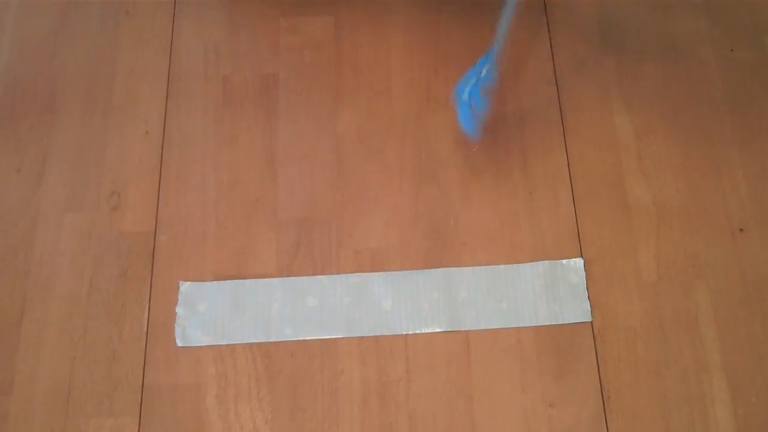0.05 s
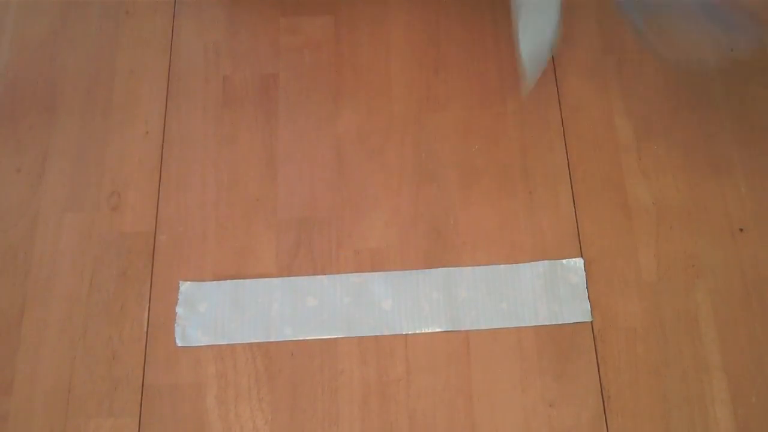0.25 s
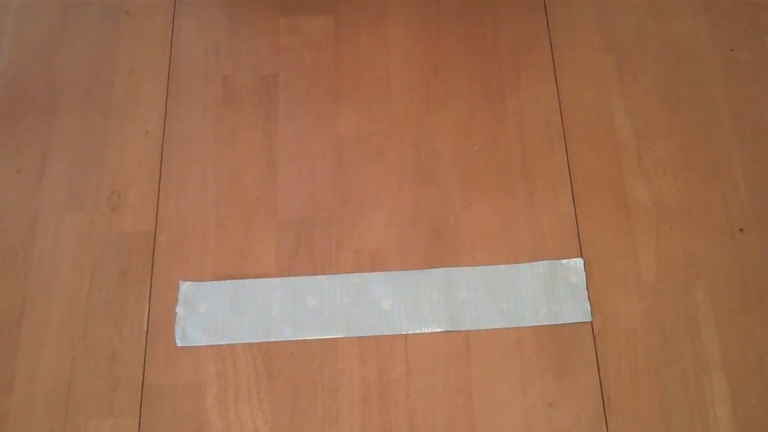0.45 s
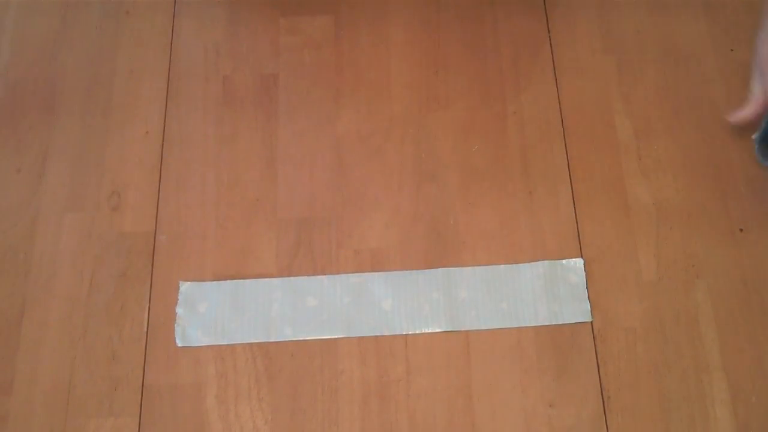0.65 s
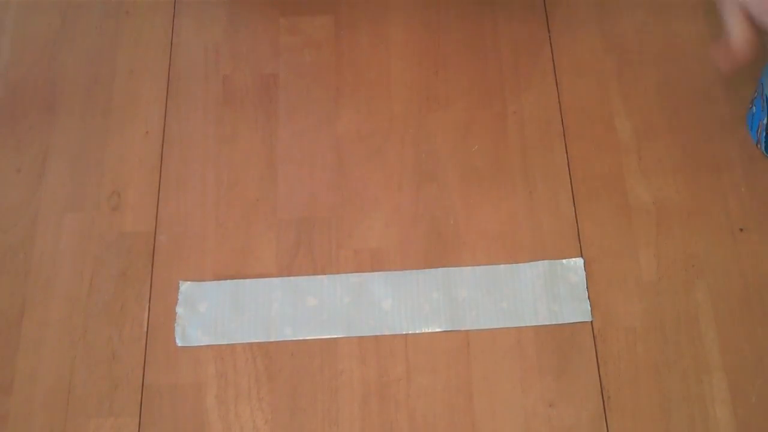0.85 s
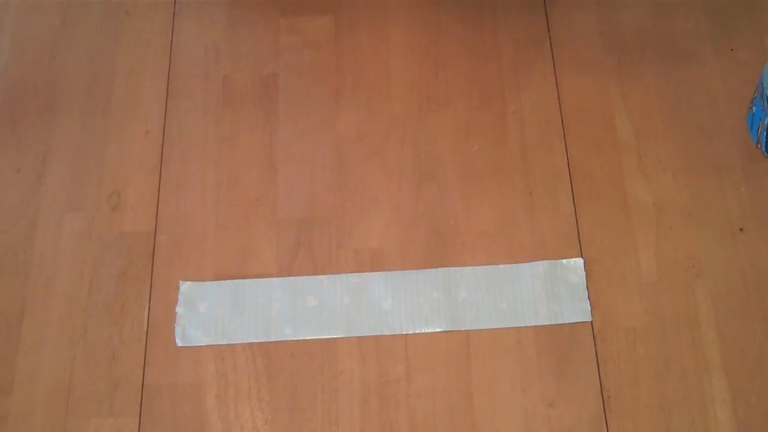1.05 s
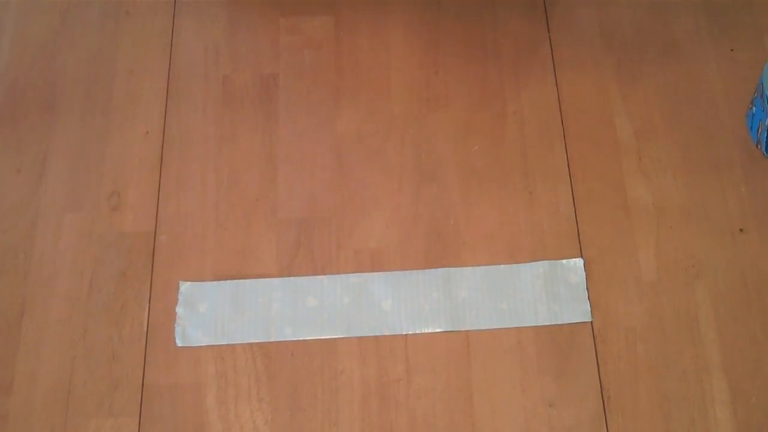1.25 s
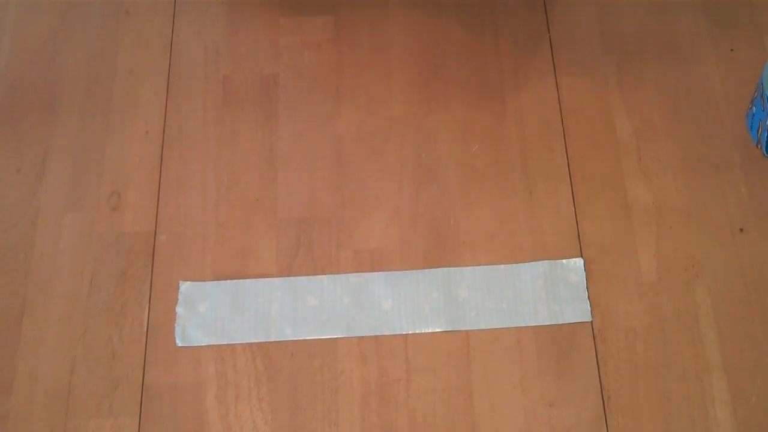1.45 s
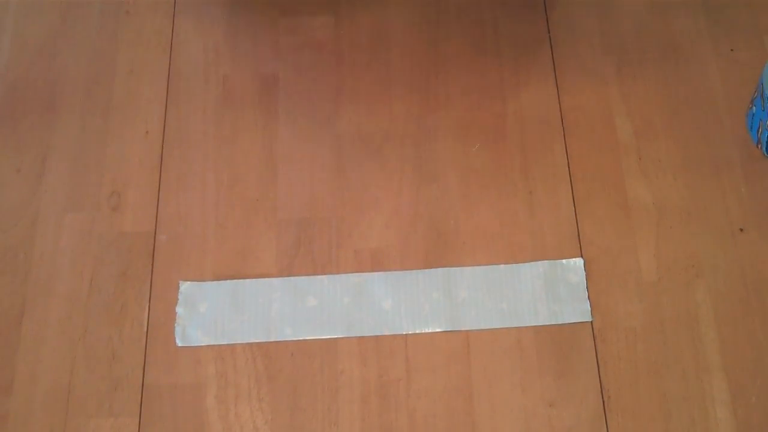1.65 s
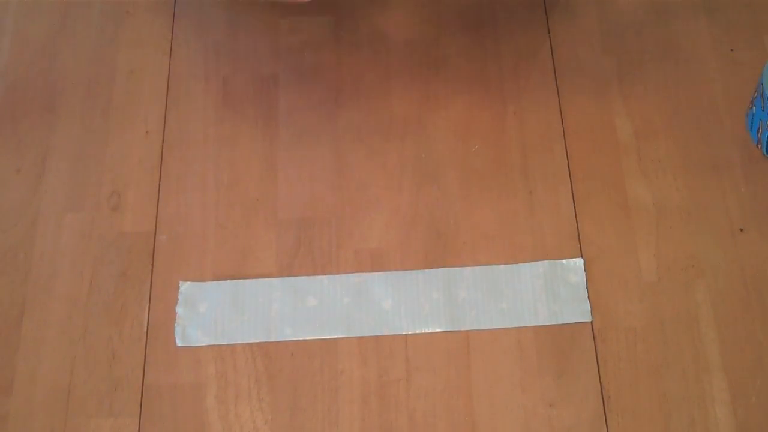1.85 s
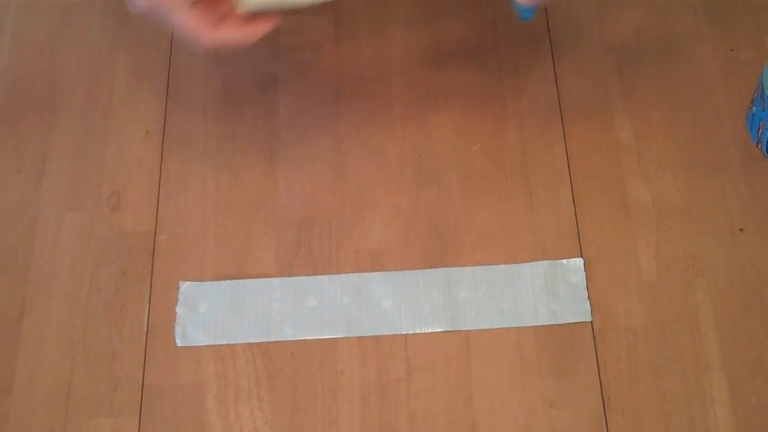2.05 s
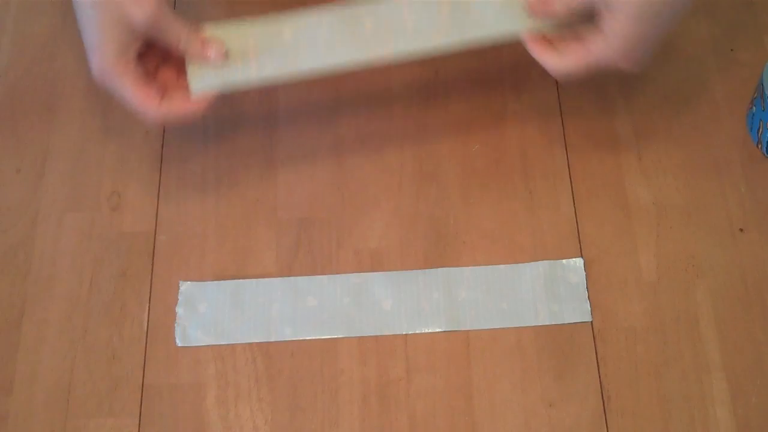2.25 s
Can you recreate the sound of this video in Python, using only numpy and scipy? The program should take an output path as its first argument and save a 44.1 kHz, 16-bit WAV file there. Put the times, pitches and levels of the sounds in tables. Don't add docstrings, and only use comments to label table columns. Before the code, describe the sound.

Cloth tape is torn by hand, single snaps speeding into a short harsh rip; the roll then clunks twice on a wooden surface, with faint jingles and rustling afterward, close microphone in a quiet humming room.

```python
import sys
import numpy as np
from scipy import signal
from scipy.fft import rfft, irfft
from scipy.io import wavfile
from scipy.ndimage import uniform_filter1d

SR = 44100
rng = np.random.default_rng(int(sys.argv[2]) if len(sys.argv) > 2 else 0)


def invert_db(x):
    u = np.asarray(x, float) / 20
    return 10 ** u


def generate_wav(sig):
    pcm = np.round(np.clip(np.atleast_2d(sig).T, -1, 1) * 32767).astype(np.int16)
    wavfile.write(sys.argv[1], SR, pcm)


N = 101429


def place(times, sizes):
    return np.bincount(np.clip((np.asarray(times) * SR).astype(int), 0, N - 1), sizes, N)


def band(x, hz, width):
    edge = np.sqrt(1 + width ** 2 / 4) + width / 2
    limits = [hz / edge, min(hz * edge, .45 * SR)]
    return signal.sosfilt(signal.butter(1, limits, "band", fs=SR, output="sos"), x)


def band_twice(x, hz, width):
    return band(band(x, hz, width), hz, width)


def colour(x, table):
    hz, db = np.array(table).T
    bins_hz = np.arange(len(x) // 2 + 1) * SR / len(x) + 1
    y = irfft(rfft(x) * invert_db(np.interp(np.log(bins_hz), np.log(hz), db)), len(x))
    return y / np.std(y)


def ring(x, hz, t60):
    pole = np.exp(2j * np.pi * hz / SR - np.log(1000) / (t60 * SR))
    return signal.lfilter([1], [1, -pole], x).imag


def walk(rate):
    w = rng.standard_normal(N // 200 + 2)
    k = max(int(SR / 200 / rate), 1)
    smooth = uniform_filter1d(uniform_filter1d(w, k), k)
    w = np.interp(np.arange(N) / 200, np.arange(len(w)), smooth)
    return w / np.std(w)


# frequency in Hz, level in dB.
AIR_COLOUR = [(25, 2), (130, -11.5), (230, -8.5), (400, -6), (900, -9.5), (3000, -18), (6000, -24.5),
              (13000, -30.5)]
# frequency in Hz, level in dB.
HUMS = [(361, -87), (414, -78.5), (458, -83.5), (888, -78.5)]
AIR_DB = -66.5


def room(t):
    hum = 0
    for hz, db in HUMS:
        hum = hum + invert_db(db + 2.6 * walk(18.0)) * np.sqrt(2) * np.sin(2 * np.pi * hz * t)
    return colour(rng.standard_normal(N), AIR_COLOUR) * invert_db(AIR_DB + 0.39 * walk(18)) + hum


# frequency in Hz, time to fall by 60 dB in seconds, level in dB.
ROOM_DECAY = [(314, 0.41, -7.5), (1040, 0.39, 2), (3000, 0.19, -4), (9450, 0.15, -0.5)]


def echo(x):
    t = np.arange(SR // 2) / SR
    tail = 0
    for hz, t60, db in ROOM_DECAY:
        tail = tail + band(rng.standard_normal(len(t)), hz, 0.98) * invert_db(db - 60 * t / t60) / np.sqrt(hz)
    tail = tail * np.clip(t / 0.0028 - .3, 0, 1)
    tail = np.gradient(tail) + 0.41 * tail
    return signal.fftconvolve(x, tail / np.sqrt(np.sum(tail ** 2)))[:N]


# frequency in Hz, level in dB, time to fall by 60 dB in seconds.
TAG_MODES = [(2955, 0, 1.0), (5512, -8, .13), (7504, -20, .07), (8020, -19, .07), (10435, -19, .08),
             (11645, -12, .11)]
# start in seconds, level in dB, brightness in dB per octave.
CLINKS = [(0.0307, -66, 5), (1.027, -61.5, 2.5), (1.074, -66, 5.5), (1.10, -63.5, -1.5),
          (1.476, -63.5, 6.5), (1.508, -69, 8), (1.529, -77, 12), (1.69, -74.5, -17), (1.952, -61.5, 0.5)]
MUTES = [.09, 1.30, 1.575, 1.98]
MUTED_T60_S = .2
RING_S, RING_HZ, RING_DB, RING_T60_S = 1.0021, 5730, -51.5, 0.18


def tag(t):
    at, db, tilt = np.array(CLINKS).T
    out = ring(place([RING_S], [invert_db(RING_DB)]), RING_HZ, RING_T60_S)
    for hz, mode_db, t60 in TAG_MODES:
        energy = 0
        levels = db + mode_db + tilt * np.log2(hz / TAG_MODES[0][0])
        for start, level in zip(at, levels):
            mute = min([m for m in MUTES if m > start] + [t[-1]])
            fade_db = 60 * np.maximum(t - start, 0) / t60
            fade_db = fade_db + 60 * np.maximum(t - mute, 0) / MUTED_T60_S
            energy = energy + (t > start) * invert_db(level - fade_db) ** 2
        loudness = uniform_filter1d(np.sqrt(energy), 40) * invert_db(1.1 * walk(60))
        out = out + loudness * np.sin(2 * np.pi * hz * t)
    return out * np.sqrt(2)


# start in seconds, level in dB, contact time in ms.
KNOCKS = [(0.6218, -26, 1.7), (.627, -29.5, 2), (.635, -34, 1.56), (.652, -40, 1.5), (0.657, -36, 2.9),
          (0.676, -41, 4.1), (0.686, -51, 2.8), (0.7554, -26, 0.41), (.764, -27, 0.73), (.773, -28.5, 0.52),
          (.780, -41, .6), (.790, -34.5, 0.71), (.798, -37.5, 0.73), (.813, -29, 0.71), (.822, -29, 1.48),
          (.836, -32, 0.86), (.851, -28.5, 1.2), (.860, -33.5, 0.88), (0.879, -41, .9)]
# frequency in Hz, level in dB, time to fall by 60 dB in seconds.
WOOD_MODES = [(272, -10.5, 0.074), (346, -6.5, 0.13), (420, -7.5, 0.12), (483, -20, 0.045),
              (605, -2.5, 0.12), (666.4, -0.5, 0.17), (729, -2.5, 0.15), (860, -5, .11), (1020, -6, 0.071),
              (1104, 1, 0.086), (1340, 6, 0.057), (1505, 3, 0.08), (1740, 0, 0.074), (2335, -7, .05)]
BUZZ_DB, BUZZ_HZ, BUZZ_S, TICK_DB = 0.5, 1230, 0.0069, -35
CORE_DB, CORE_HZ, CORE_S = -8, 2170, 0.015
SOFT_TILT_DB = 6
MODE_DRIFT = .007
TABLE_LOW_HZ = 204


def knocks():
    out, t = np.zeros(N + SR // 2), np.arange(SR // 6) / SR
    for at, db, ms in KNOCKS:
        push = t ** 2 * np.exp(-t * 7000 / ms)
        push /= push.sum()
        chance = rng.standard_normal((len(WOOD_MODES), 2))
        body = 0
        for (hz, mode_db, t60), (luck, drift) in zip(WOOD_MODES, chance):
            level = mode_db + 2.6 * luck - SOFT_TILT_DB * (ms - 0.98) * np.log2(hz / 600)
            body = body + invert_db(level) * np.sign(drift) * ring(push, hz * (1 + MODE_DRIFT * drift), 0.62 * t60)
        buzz = band(rng.standard_normal(len(t)), BUZZ_HZ, 1.27) * np.exp(-t / BUZZ_S) * 4.44
        core = band(rng.standard_normal(len(t)), CORE_HZ, 0.65) * np.exp(-t / CORE_S) * 3.45
        buzz += invert_db(CORE_DB) / ms * core
        buzz = signal.fftconvolve(buzz, push)[:len(t)]
        tick = -invert_db(TICK_DB) * np.gradient(push) * 25.0
        i = int(at * SR)
        out[i:i + len(t)] += invert_db(db) * (0.54 * body + invert_db(BUZZ_DB) * buzz + tick)
    return signal.sosfilt(signal.butter(2, TABLE_LOW_HZ, "high", fs=SR, output="sos"), out[:N])


SPAN_HZ = 3130


def burst(out, at, db, hz, width, fade_s, span_db):
    t = np.arange(2000) / SR
    spray = rng.standard_normal(len(t)) * (t / fade_s) * np.exp(1 - t / fade_s)
    sound = band_twice(spray, hz, width * 1.36) * np.sqrt(5000 / hz)
    sound = sound + invert_db(span_db) * band(spray, SPAN_HZ, 0.19) * 1.5
    start = int((at - fade_s / 2) * SR)
    return out + np.pad(invert_db(db) * 1.165 * sound, (start, N))[:N]


def knock_edge():
    return burst(np.zeros(N), at=.7559, db=-21.5, hz=3000, width=0.6, fade_s=.0005, span_db=-8)


# time in seconds, level in dB, centre in Hz.
RUSTLE = [(0, -96, 3000), (.09, -58.5, 3000), (.2, -59, 3000), (0.508, -64, 3450), (0.528, -43.5, 2490),
          (.552, -52.5, 3000), (0.572, -44, 3420), (.66, -83, 3970), (0.856, -56.5, 8150), (.9, -73, 7360),
          (1.48, -75, 4000), (1.605, -67, 3000), (1.92, -79.5, 2820), (1.98, -60, 2850), (2.05, -60, 2900),
          (2.12, -57.5, 3000), (2.18, -58.5, 3000), (2.25, -58.5, 2800)]
GRAINS_PER_S, SCATTER_DB, EDGE_DB, FLICKER_DB = 6000, 0.5, 2.5, 2.56
RUSTLE_OCTAVES, SURGE_DB = 0.22, 1.1


def rustle(t):
    at, db, hz = np.array(RUSTLE).T
    hit = rng.random(N) < GRAINS_PER_S / SR
    grains = hit * rng.standard_normal(N) * invert_db(SCATTER_DB * rng.exponential(size=N))
    grains = grains + 0.52 * rng.standard_normal(N)
    centre, out = np.log2(np.interp(t, at, hz)), 0
    for f in 1500 * 2 ** np.arange(0, 3.2, 1 / 3):
        distance = (np.log2(f) - centre) / RUSTLE_OCTAVES
        shape = np.exp(-distance ** 2) + invert_db(EDGE_DB)
        part = band_twice(np.roll(grains, int(f)), f, 0.68) * (3000 / f) ** 0.53
        out = out + part * invert_db(FLICKER_DB * walk(30)) * shape
    return out / np.std(out) * invert_db(np.interp(t, at, db) + SURGE_DB * walk(70))


# start in seconds, length in seconds, level in dB,
# first pitch in Hz, last pitch in Hz.
SLIDES = [(0.094, 0.07, -65, 6100, 5980), (0.512, 0.031, -59, 2250, 2360), (0.538, .02, -57, 3200, 3320),
          (0.565, 0.02, -64, 3140, 3270), (1.513, 0.037, -70, 4700, 3750), (1.96, 0.017, -63, 2130, 2200),
          (2, 0.14, -65, 5910, 6680), (2.071, .045, -65, 2800, 3000), (2.105, .05, -64, 3300, 3300),
          (2.086, .065, -69, 1600, 1680), (2.178, 0.071, -65, 4060, 4480), (2.21, 0.08, -65.5, 2200, 2530),
          (2.223, 0.075, -62.5, 3600, 3660), (2.194, 0.086, -61, 2920, 2786)]
ROUGHNESS = .12


def squeak(t):
    out = 0
    for at, length, db, from_hz, to_hz in SLIDES:
        part = np.clip((t - at) / length, 0, 1)
        k = int(SR / (ROUGHNESS * from_hz))
        swell = np.sqrt(2 * k * np.abs(np.sin(np.pi * part)))
        rough = uniform_filter1d(rng.standard_normal(N), k) * swell
        glide_hz = from_hz + (to_hz - from_hz) * part
        out = out + invert_db(db) * rough * np.sin(2 * np.pi * np.cumsum(glide_hz) / SR)
    return out


# start in seconds, level in dB.
TUGS = [
    (.092, -56),
    (.572, -54),
    (1.586, -62),
    (2.003, -64),
    (.246, -33.5),
    (.256, -39.5),
    (.266, -27.5),
    (.284, -45),
]


def tugs():
    out = np.zeros(N)
    for at, db in TUGS:
        out = burst(out, at, db, hz=530, width=4.1, fade_s=0.00306, span_db=-42)
    return out


# start in seconds, level in dB, brightness in Hz.
CRACKLES = [(0.434, -47, 7000), (0.467, -46, 3000), (0.497, -45, 5000), (.501, -48, 4010),
            (0.528, -52, 4000), (0.534, -42, 5950), (.545, -49, 4000), (0.5506, -42, 4000),
            (.560, -56, 4030), (.566, -49, 3800), (.5705, -34, 3800), (.5752, -38, 5500),
            (0.5795, -59, 4000), (0.592, -45, 3000), (0.621, -53, 2510), (1.3112, -54.5, 2340),
            (1.322, -66, 3000), (1.403, -67, 6000), (1.586, -49, 703), (1.6011, -46.5, 3940),
            (1.61, -53, 4970), (1.605, -50, 1790), (1.615, -52, 2500), (1.625, -66, 3000),
            (1.8226, -54, 6600), (1.84, -58, 4950), (1.931, -55, 4800), (1.944, -57, 5850),
            (1.985, -50, 4000), (1.991, -43.5, 6000), (2.000, -51, 3280), (2.0024, -42, 3240)]


def crackles():
    out = np.zeros(N)
    for at, db, hz in CRACKLES:
        out = burst(out, at, db, hz, width=1.34, fade_s=.001, span_db=-1)
    return out


# time in seconds, level in dB.
RIP = [
    (.236, -44),
    (0.242, -33),
    (.26, -27.5),
    (.275, -29),
    (0.287, -27),
    (0.298, -32.5),
]
# frequency in Hz, level in dB.
RIP_COLOUR = [(100, -27), (400, -17.5), (1400, -4), (2500, -3.5), (4500, -4), (7760, -3), (12500, -14),
              (14500, -23)]


def rip(t):
    at, db = np.array(RIP).T
    level = np.interp(t, at, db, -120, -120) + 3 * walk(200)
    return colour(rng.standard_normal(N), RIP_COLOUR) * invert_db(level)


# start in seconds, level in dB, brightness in Hz,
# table bounce in dB.
SNAPS = [(0.0537, -46, 6860, 1.5), (0.059, -46.5, 5800, 2), (0.0896, -42.5, 6250, 6),
         (.0977, -42, 6100, 11), (0.108, -54, 4000, -1), (0.1181, -38.5, 7150, 4.5), (0.1237, -37, 7000, 2),
         (.130, -56, 6000, -4), (0.1509, -46.5, 4950, 11), (0.1654, -46, 4970, 12.5), (.180, -37, 8000, 5),
         (0.1903, -42, 5000, 11.5), (.2072, -34, 9000, 4), (0.2122, -28, 9000, -5), (0.2191, -23, 9000, -3),
         (0.225, -26, 8100, 5), (0.2293, -25, 6900, 2), (0.2332, -24.5, 7500, 2)]
# start in seconds, level in dB, brightness in Hz,
# table bounce in dB.
THREADS = [(.238, -22, 6950, -3), (.2423, -20, 6940, -6), (.2453, -24, 5960, 2), (.2469, -25, 5950, 0.5),
           (.2493, -21, 8060, 0.5), (.2526, -19.5, 6000, -5), (.2551, -19, 7000, -8.5),
           (.2579, -18.5, 6000, -2), (.2597, -22, 5000, -1), (.262, -18, 7840, -6),
           (.2647, -20, 6960, -1.5), (.2679, -22, 8050, -3), (.2702, -20, 8000, 1),
           (.2718, -13.5, 6000, 0.5), (.2757, -19, 4000, -7), (.2783, -20, 6900, -7.5),
           (.2817, -21.5, 5000, 4), (.2844, -19, 6000, 5), (.2892, -35, 6000, -13), (.2935, -32, 5000, -5)]
BREAK_S, FRAY_DB, FRAY_S = .0004, -5, .0016
BOUNCE_S, BOUNCE_HZ, BOUNCE_WIDTH = .0016, 3100, .9
FLAP_DB, FLAP_HZ = -12, 1000


def snaps():
    out, t = np.zeros(N), np.arange(600) / SR
    for at, db, hz, bounce_db in list(SNAPS) + list(THREADS):
        chance = rng.standard_normal((2, len(t)))
        snap = chance[0] * np.exp(-t / BREAK_S)
        fray = invert_db(FRAY_DB) * chance[1] * np.exp(-t / FRAY_S)
        snap = snap / np.sqrt(np.sum(snap ** 2)) * 3.9 + fray
        near = band_twice(snap, hz, 1.45) + invert_db(FLAP_DB) * 4 * band_twice(snap, FLAP_HZ, 1.3)
        back = np.roll(band_twice(snap, BOUNCE_HZ, BOUNCE_WIDTH), int(BOUNCE_S * SR))
        both = near / np.linalg.norm(near) + invert_db(bounce_db - 3) * back / np.linalg.norm(back)
        out[int(at * SR):][:len(t)] += invert_db(db) * 4.29 * both
    return out


def scene():
    t = np.arange(N) / SR
    roll = knocks()
    tape = rustle(t) + crackles() + rip(t) + snaps()
    wet = echo(invert_db(-10) * tape + invert_db(-5.5) * roll)
    handling = tugs() + squeak(t)
    return (room(t) + tag(t) + roll + knock_edge() + handling + tape + wet)[None]


def top_cut(x):
    return signal.sosfilt(signal.butter(12, 14730, fs=SR, output="sos"), x)


# time in seconds, change in dB.
DUCKS = [
    (0.225, 0),
    (0.25, -3.5),
    (0.271, -3),
]
STEP_S, STEP_DB, CLIMB_S, EARLY_CLIMB_S = .0345, .5, .618, .025
OFFSET, OFFSET_S, OFFSET_START = 0.053, 0.087, 0.0057
TOP_HZ = 13950


def record(dry):
    early, late = np.arange(3), np.arange(14)
    duck_s, duck_db = np.array(DUCKS).T
    at = np.r_[EARLY_CLIMB_S + STEP_S * early, duck_s, CLIMB_S + STEP_S * late]
    change_db = np.r_[STEP_DB + 0 * early, duck_db, STEP_DB + 0 * late]
    db = np.cumsum(place(at, change_db))
    gain = uniform_filter1d(invert_db(db - db[-1]), 130)
    leak = np.exp(-1 / (OFFSET_S * SR))
    drift = signal.lfilter([1, -1], [1, -leak], OFFSET * (gain - gain[0]))
    drift = drift + OFFSET_START * leak ** np.arange(N)
    heard = signal.sosfilt(signal.ellip(8, .2, 60, TOP_HZ, fs=SR, output="sos"), dry)
    return top_cut(heard * gain + drift)


dry = scene()
out = record(dry)
generate_wav(out)
```